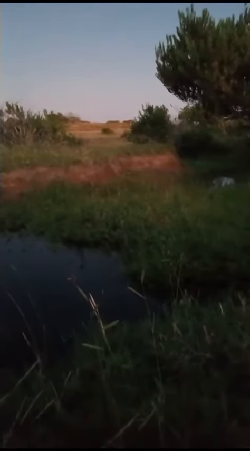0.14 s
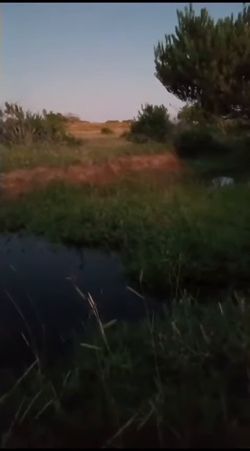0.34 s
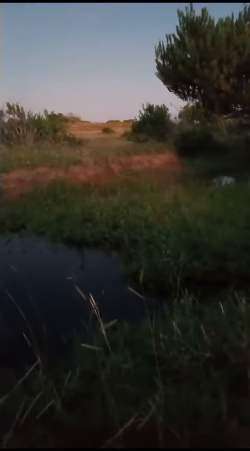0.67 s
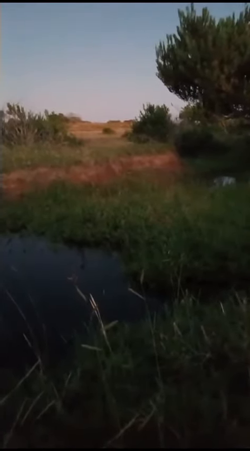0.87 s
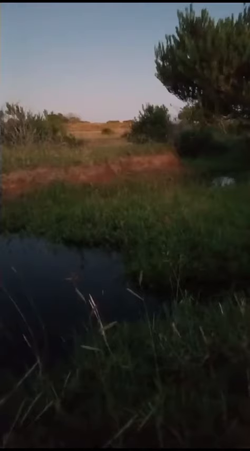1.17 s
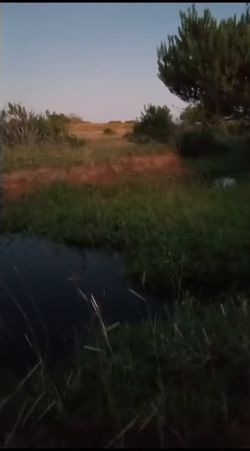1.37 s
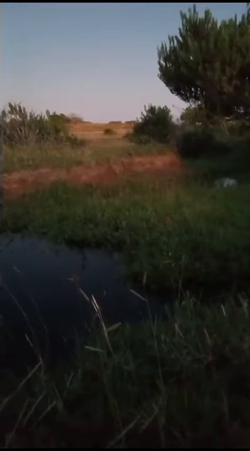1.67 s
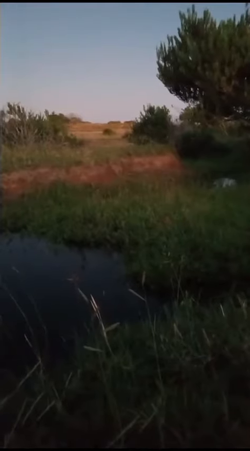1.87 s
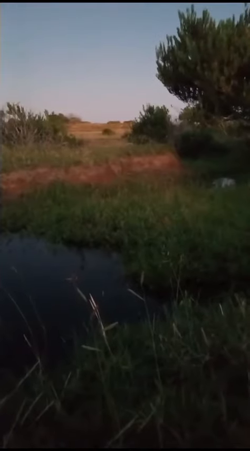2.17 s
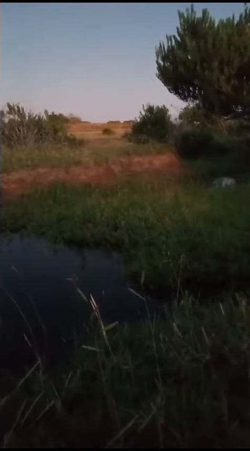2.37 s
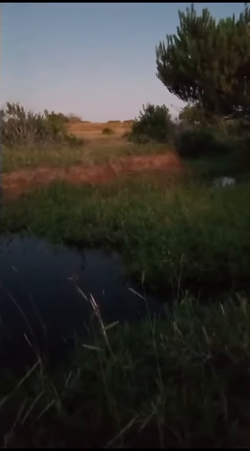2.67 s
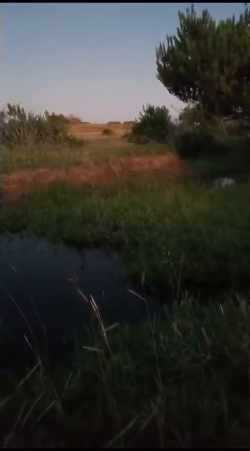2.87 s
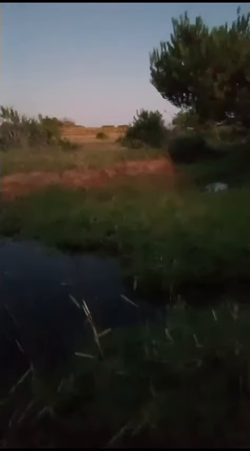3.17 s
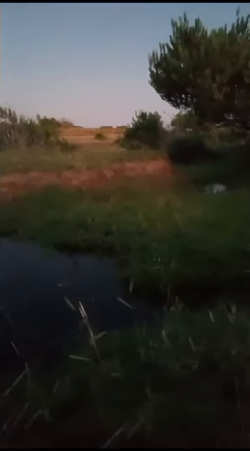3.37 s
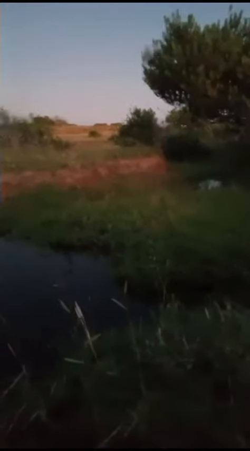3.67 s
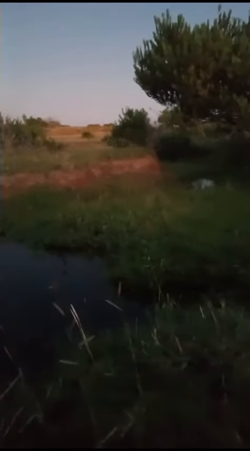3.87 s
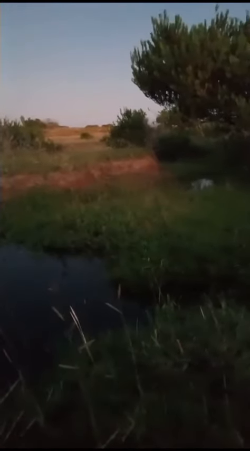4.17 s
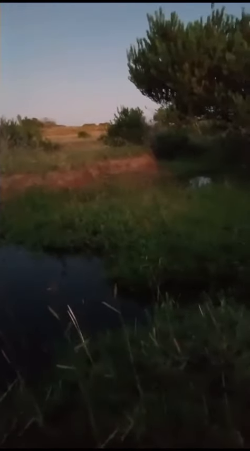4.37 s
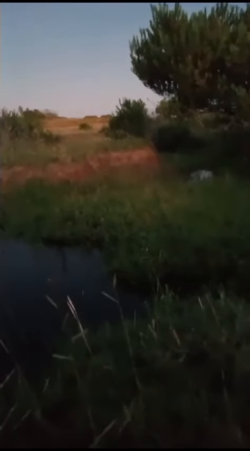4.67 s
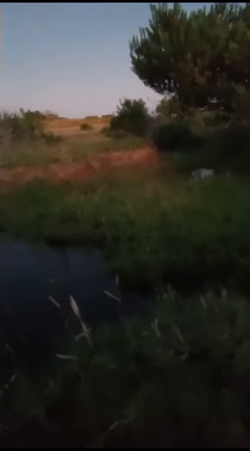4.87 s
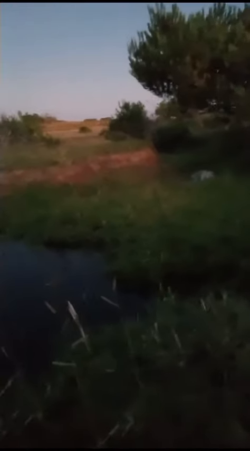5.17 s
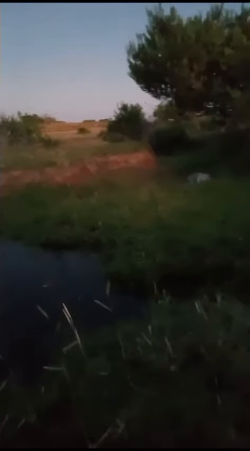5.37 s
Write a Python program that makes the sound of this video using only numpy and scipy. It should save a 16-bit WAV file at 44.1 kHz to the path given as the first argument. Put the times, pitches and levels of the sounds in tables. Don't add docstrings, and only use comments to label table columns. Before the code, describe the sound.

Frogs at a grassy pond at dusk: rapid paired high ticks and a far trill, arched chirping cries, then a close buzzing trill.

```python
import sys
import numpy as np
from scipy import signal
from scipy.fft import rfft, irfft
from scipy.io import wavfile
from scipy.ndimage import uniform_filter1d

SR = 44100
rng = np.random.default_rng(int(sys.argv[2]) if len(sys.argv) > 2 else 0)


def undo_db(level):
    steps = np.asarray(level, float) / 20
    return 10 ** steps


def to_wav(sig):
    pcm = np.clip(np.atleast_2d(sig), -1, 1) * 32767
    pcm = np.round(pcm).astype(np.int16)
    wavfile.write(sys.argv[1], SR, pcm.T)


N = 243873
TIME = np.arange(N) / SR

# start_s, rate_pulses_per_s, full_sac_hz, level_db
NEAR_TRILL_SLIPS = [(3.31, 219, 5050, -29), (3.345, 224, 5185, -27.5), (3.41, 216.5, 5020, -27),
                    (3.63, 217.3, 5033, -25), (3.865, 210, 5090, -24), (4.05, 214.8, 5110, -26),
                    (4.28, 215, 5144, -25.5), (4.42, 211, 5090, -26), (4.62, 210, 5150, -24),
                    (4.81, 208.7, 5060, -24.5), (5.0, 205, 5036, -25.5), (5.181, 206.5, 5120, -26),
                    (5.42, 204.5, 5060, -28)]
CREEP_PER_S2, SLIP_S = 3.5, .03
SAC_SLACK_HZ, SAC_FILL_S = 1050, 0.1
# start_s, rate_pulses_per_s, sac_hz, level_db
FAR_TRILL_COURSE = [
    (0, 188.4, 5100, -25.5),
    (.12, 188, 5100, -34),
    (.39, 187.8, 5100, -33),
    (.5, 187.6, 5100, -39),
    (.75, 186.8, 5100, -38.5),
    (.93, 185.5, 5100, -32.5),
    (1.075, 184.7, 5100, -33.5),
]
# start_s, rate_pulses_per_s, sac_hz, level_db
FAINT_TRILL_COURSES = [
    [(0, 196.7, 4430, -46), (.6, 193.3, 4910, -63), (1.9, 188, 4680, -63)],
    [(1.7, 213.2, 4180, -81), (1.9, 221.5, 4230, -45), (2.1, 223.7, 4220, -53.5), (2.8, 221, 4230, -52),
     (3.3, 211, 4170, -74)],
]
# first_tick_s, gap_s, peak_db
QUICK_PAIRS = [(.2054, 0.026, -18.5), (.312, 0.038, -19), (.4209, 0.038, -19), (.5307, 0.038, -20),
               (.638, 0.04, -19.5), (.7482, 0.041, -19), (.8594, 0.042, -18), (.9682, 0.04, -20),
               (1.0788, .0416, -19.5), (1.1912, 0.037, -18.5), (1.2965, 0.034, -19), (1.3997, .0345, -20),
               (1.502, 0.035, -20.5), (1.6053, 0.035, -20.5), (1.709, 0.035, -20), (1.8143, 0.035, -19),
               (1.919, .0325, -19.5), (2.0233, .0356, -19.5), (2.1296, 0.036, -19.5), (2.2358, 0.035, -19),
               (2.341, .0337, -18.5), (2.4446, 0.037, -20.5), (2.549, 0.034, -19), (2.6538, 0.036, -18),
               (2.7577, .0348, -18.5), (2.8634, 0.035, -18.5), (2.9686, 0.038, -18.5), (3.0777, .0381, -19),
               (3.1857, .0362, -21.5), (3.2948, 0.038, -22.5)]
# first_tick_s, gap_s, peak_db
SLOW_TICK_PAIRS = [(3.4082, .0378, -27), (3.5229, 0.049, -22), (3.65, .0405, -29), (3.7794, 0.034, -24),
                   (3.902, .0389, -22.5), (4.0301, .0383, -24.5), (4.1614, 0.048, -21),
                   (4.2914, .0426, -26), (4.4194, 0.039, -26), (4.545, 0.046, -25.5), (4.672, 0.052, -22),
                   (4.8294, 0.033, -26), (4.9474, 0.022, -26.5), (5.2116, .0339, -22.5),
                   (5.4191, 0.032, -24)]
QUICK_SECOND_DB, SLOW_SECOND_DB = 0.6, 5.5
# start_s, peak_db
STRAY_TICKS = [(.0403, -19.5), (.0805, -18.5), (.1516, -20.5), (3.258, -32), (5.0294, -17),
               (5.3221, -19.5)]
# start_s, peak_db
LOWER_TICKS = [(0.1537, -24), (4.5144, -31), (4.6502, -20), (4.6694, -23.5), (5.007, -25), (5.1472, -15.5),
               (5.2864, -19.5), (5.3044, -29), (5.4144, -18)]
# start_s, voice_clears_s, pitch_drops_s, top_of_third_partial_hz, third_db
CRY_EVENTS = [(1.1, 1.135, 1.218, 3830, -42), (1.525, 1.568, 1.648, 3800, -33),
              (1.925, 1.968, 2.055, 3850, -30), (2.345, 2.405, 2.475, 3850, -29),
              (2.765, 2.81, 2.892, 3860, -30), (3.175, 3.268, 3.315, 3700, -31),
              (3.6, 3.636, 3.745, 3730, -35), (3.99, 4.104, 4.124, 3740, -35),
              (4.37, 4.424, 4.507, 3700, -36), (4.748, 4.864, 4.888, 3700, -31),
              (5.155, 5.276, 5.29, 3620, -30)]
# hoarse_third_db, second_db, brightness_db
CRY_TIMBRES = [(-52.5, -56.5, 6.5), (-41.5, -43.5, 4.5), (-40.5, -40.5, 4), (-38.5, -38, 4.5),
               (-34.5, -34.5, -0.5), (-32.5, -35, -9.5), (-42, -40.5, -9.5), (-39.5, -44.5, -15),
               (-40.5, -41, -15.5), (-34.5, -36.5, -20), (-42.5, -40.5, -14)]
# multiple, level_db relative to the second
CRY_UPPER_PARTIALS = [(4, -20), (5, 2), (6, -15.5), (7, -26), (8, -42.5), (9, -30), (10, -41), (11, -43.5),
                      (12, -44)]
# after_start_s, third_hz, third_db, second_db
HOARSE_OPENING = [
    (0, 3100, -22, -18),
    (.02, 3220, -4, -10),
]
# before_clearing_s, third_hz, third_db, second_db
HOARSE_CLOSE = (.007, 3400, 0.1, -5)
# after_s, under_top_hz, third_db, second_db
CLEAR_VOICE = [
    (.004, 10, -3, 0.1),
    (0, 10, -5, -3),
]
# after_drop_s, under_top_hz, third_db, second_db
PITCH_DROP = [
    (0, 90, 0.1, -4),
    (.018, 310, -1, -14),
    (.034, 680, -10, -30),
    (.066, 1220, -40, -62),
]
TIRED_S, TIRED_FALL = 3.9, 0.55
# start_s, length_s
VOICE_BREAKS = [(2.852, .006), (4.07, .033), (4.458, .031), (4.838, .025), (5.247, .028)]
BREAK_DB = -20
# start_s, peak_db
WHOOP_EVENTS = [(0.1477, -40.5), (0.4551, -40.5), (0.7588, -40), (1.058, -40.5), (1.2609, -40.5),
                (1.5604, -41), (1.884, -40.5), (2.151, -42), (2.516, -40.5), (3.0777, -41.5), (3.3918, -43),
                (3.6017, -43.5), (3.8056, -43.5), (4.0136, -45), (4.362, -42.5), (4.7355, -44.5),
                (5.073, -43.5), (5.3641, -43)]
# after_start_s, pitch_hz, level_db
WHOOP_SWEEP = [
    (-.006, 970, -9.5),
    (0, 1200, 2),
    (.005, 1300, -10.5),
    (.010, 1770, 17),
    (0.013, 1950, 12),
    (.019, 2210, -4),
    (.023, 2200, -24.5),
]
# start_s, length_s, fall_already_past_s, first_partial_db, fifth_partial_db
WHINE_EVENTS = [(0, 0.055, 0.4, -64, -76.5), (0.293, 0.59, 0.0056, -56, -71),
                (1.045, 0.078, 0.063, -66, -66), (1.282, 0.37, 0.06, -61, -79),
                (1.872, 0.41, 0.15, -66.5, -83), (2.628, 0.089, 0.048, -61.5, -68),
                (2.773, 0.508, 0.022, -54, -64), (5.207, 0.2, 0.03, -59.5, -76.5),
                (5.447, .14, 0.0099, -50.5, -62)]
WHINE_TOP_HZ, WHINE_REST_HZ, WHINE_SINK_S = 679, 429.3, .165
WHINE_SAG_HZ_PER_S, WHINE_RELEASE_DB = 49, 16.5
CATCH_HZ, CATCH_WIDTH_HZ, CATCH_DB = 449, 19.2, 21
MOUTH_HZ, MOUTH_DB_PER_HZ = 456, 0.2151
# start_s, length_s, from_hz, to_hz, level_db
UPPER_WHINES = [(.85, .23, 398, 378, -60), (1.46, .09, 458, 433, -60), (1.83, .13, 505, 490, -61),
                (2.66, .12, 385, 380, -62), (3.33, .24, 462, 432, -57)]
# start_s, length_s, level_db, bubble_hz
SPLASH_EVENTS = [(1.196, 0.085, -51.5, 837), (1.226, 0.056, -54.5, 1084), (1.246, 0.086, -54.5, 640),
                 (1.476, 0.088, -62, 836), (1.517, 0.026, -67, 625), (2.117, 0.083, -60, 605),
                 (2.174, 0.036, -49.5, 610), (3.21, 0.02, -45.5, 523), (3.201, 0.5, -57.5, 1940),
                 (3.297, 0.081, -51, 1110), (4.984, 0.075, -60, 223), (3.181, 0.13, -64.5, 102)]
# time_s, level_db
BACKGROUND_LEVEL = [
    (0, 0.4),
    (3.3, -4),
    (3.6, -7.5),
    (4.9, -8),
    (5.53, -3),
]
# frequency_hz, density_db_per_hz
CHORUS_SPECTRUM = [(3600, -60), (3950, -45.5), (4200, -14), (4800, -10.5), (5160, -1.5), (5700, -11.5),
                   (6400, -19), (6650, -40.5), (7200, -60.5)]
# frequency_hz, density_db_per_hz
RUMBLE_SPECTRUM = [(20, -5.5), (40, -18), (65, 0.5), (120, -0.5), (250, -1.5), (330, -10.5), (450, -24)]
# frequency_hz, density_db_per_hz
HISS_SPECTRUM = [(250, 7.5), (500, 8.5), (1300, 2.5), (2000, 11), (3500, 3), (6500, 8.5), (8000, 4.5),
                 (9300, 1.5), (10000, -14), (14500, -24.5), (15300, -8.5), (16000, -22)]
CHORUS_DB, RUMBLE_DB, HISS_DB = -40, -63.5, -62
CHORUS_FOLLOWS, RUMBLE_FOLLOWS = 0.47, 0.68


def rms_one(x):
    return x / np.sqrt(np.mean(x ** 2) + 1e-20)


def span(rows):
    s, *columns = np.transpose(rows)
    part = slice(max(int(s[0] * SR), 0), min(int(s[-1] * SR), N))
    return part, [np.interp(TIME[part], s, column) for column in columns]


def fade(count, ramp_s):
    i = np.arange(count)
    return np.clip(np.minimum(i, count - i) / (ramp_s * SR), 0, 1)


def drift(rate_hz, count=N):
    rate_hz = min(rate_hz, 400)
    knots = rng.standard_normal(6 * 400 + 2)
    return 1.2 * np.interp(np.arange(count) / SR * rate_hz, np.arange(len(knots)), knots)


def phase_of(hz):
    return 2 * np.pi * np.cumsum(hz) / SR


def coloured(points):
    hz = np.fft.rfftfreq(N, 1 / SR) + 1
    at_hz, db = np.transpose(points)
    gain = undo_db(np.interp(np.log(hz), np.log(at_hz), db, -120, -120))
    return rms_one(irfft(rfft(rng.standard_normal(N)) * gain, N))


def near_rows():
    s, per_s, full_hz, db = np.transpose(NEAR_TRILL_SLIPS)
    ends = np.append(s[1:] - SLIP_S, N / SR)
    t = np.arange(s[0], N / SR + .005, .005)
    crept = per_s + CREEP_PER_S2 * (ends - s)
    rate = np.interp(t, np.ravel([s, ends], "F"), np.ravel([per_s, crept], "F"))
    sac_hz = np.interp(t, s, full_hz) - SAC_SLACK_HZ * np.exp(-(t - s[0]) / SAC_FILL_S)
    return np.transpose([t, rate, sac_hz, np.interp(t, s, db)])


def trill(rows, width_hz, waver_db, skirt_db, overtone_db, ground):
    part, (per_s, sac_hz, level_db) = span(rows)
    count = len(per_s)
    every = np.arange(count)
    coarse = np.arange(0, count, 100)
    pulse = np.exp(1j * phase_of(per_s * (1 + 0.00061 * drift(60, count))))
    partial = pulse ** 12
    voice = 0
    for k in range(13, 31):
        partial = partial * pulse
        hz = k * per_s[coarse]
        off = (hz - sac_hz[coarse]) / width_hz
        sac = np.exp(-off ** 2 / 2 + .45j * off ** 2 - .06j * off ** 3)
        sac += undo_db(skirt_db - 3.5 * np.abs(off)) * (off < 0) * np.exp(.9j * k * k)
        sac *= 1 + ground * np.exp(-2j * np.pi * hz * .002657)
        waver = undo_db(waver_db * drift(8.88, count))
        voice = voice + np.interp(every, coarse, sac) * waver * partial
    voice = voice / np.sqrt(uniform_filter1d(np.abs(voice) ** 2, size=2200) / 2)
    low = voice / pulse
    second_db, third_db = overtone_db
    tone = undo_db(level_db) * voice.real
    tone += undo_db(second_db) * (low * low).real
    tone += undo_db(third_db) * (voice * voice * voice).real
    out = np.zeros(N)
    out[part] = tone * fade(count, 0.0045)
    return out


def paired(rows, second_db):
    return [tick for s, gap, db in rows for tick in [(s, db), (s + gap, db + second_db)]]


def ticks(rows, first_hz, trim_db):
    out = np.zeros(N + SR)
    t = np.arange(int(.03 * SR)) / SR
    shape = (1 - np.exp(-t / 0.00076)) ** 2 * undo_db(-60 * t / 0.028) * 1.797
    second = np.diff(np.array(rows)[:, 0], prepend=-1) < .05
    chances = rng.random((len(rows), 2))
    for (s, db), late, (beat, start) in zip(rows, second, chances):
        hz = first_hz + 60 * late
        upper_mode = np.sin(2 * np.pi * (hz + 190) * t + 6 * start)
        tone = np.sin(2 * np.pi * hz * t) + (0.23 * beat + 0.33 * late) * upper_mode
        tone += undo_db(-55.0) * np.sin(4 * np.pi * hz * t)
        tone += undo_db(-58.5) * np.sin(6 * np.pi * hz * t)
        tone += undo_db(-17.0) * np.sin(2 * np.pi * 0.857 * hz * t) * np.exp(-t / 0.0027)
        i = max(int((s - .0012) * SR), 0)
        out[i:i + len(t)] += undo_db(db + trim_db) * shape * tone
    return out[:N]


def cry_rows(start, clear, drop, top_hz, db, hoarse_db, second_db):
    rows = [(start + s, hz, hoarse_db + a, second_db + b) for s, hz, a, b in HOARSE_OPENING]
    before_s, hz, a, b = HOARSE_CLOSE
    rows.append((clear - before_s, hz, hoarse_db + a, second_db + b))
    anchors = [clear, (clear + drop) / 2] + [drop] * len(PITCH_DROP)
    fall = TIRED_FALL if start > TIRED_S else 1
    for at, (s, under_hz, a, b) in zip(anchors, CLEAR_VOICE + PITCH_DROP):
        rows.append((at + s, top_hz - under_hz, db + a, second_db + b * fall))
    return rows


def cries():
    out = np.zeros(N)
    for row, (hoarse_db, low_db, bright_db) in zip(CRY_EVENTS, CRY_TIMBRES):
        start_s, clear_s = row[:2]
        part, (third_hz, third_db, second_db) = span(cry_rows(*row, hoarse_db, low_db))
        t, count = TIME[part], len(third_hz)
        hoarse = np.clip((clear_s - t) / 0.00067, 0, 1)
        pulses = np.sin(phase_of(150 + 30 * drift(60, count)))
        chop = 1 + hoarse * (.8 * pulses + .3 * drift(350, count)) + .12 * drift(150, count)
        chop += 1.3 * hoarse * uniform_filter1d(rng.standard_normal(count), size=24)
        jitter = (.003 + .019 * hoarse) * drift(300, count)
        phase = phase_of(third_hz / 3 * (1 + jitter))
        push = np.interp(t, [start_s, start_s + .04, clear_s + .04], [-.03, .055, .075])
        lift = phase_of(third_hz * hoarse * push)
        voice = undo_db(third_db) * np.sin(3 * phase)
        voice += undo_db(second_db) * (np.sin(2 * phase + lift) + undo_db(-35.0) * np.sin(phase))
        for k, db in CRY_UPPER_PARTIALS:
            partial_db = second_db + db + bright_db - 3.7 * hoarse + 2.1 * drift(150, count)
            voice += undo_db(partial_db) * np.sin(k * phase)
        out[part] += np.sqrt(2) * voice * chop * fade(count, .008)
    for s, length in VOICE_BREAKS:
        corners = [s - .006, s, s + length - .004, s + length]
        out *= undo_db(np.interp(TIME, corners, [0, BREAK_DB, BREAK_DB, 0]))
    return out


def whoops():
    out = np.zeros(N)
    variations = rng.normal(1, 0.028, (len(WHOOP_EVENTS), 2))
    for (s, db), (bend, stretch) in zip(WHOOP_EVENTS, variations):
        part, (hz, level_db) = span(np.array(WHOOP_SWEEP) * [stretch, bend, 1] + [s, 0, db])
        out[part] += undo_db(level_db + 1.0) * np.sin(phase_of(hz)) * fade(len(hz), 0.0045)
    return out


def upper_group(phase):
    group = 0
    for k, db in [(5, 0), (6, -3), (7, -11)]:
        group = group + undo_db(db + 6 * drift(18, len(phase))) * np.sin(k * phase)
    return group


def whines():
    out = np.zeros(N)
    for s, length, past, first_db, fifth_db in WHINE_EVENTS:
        part, (t,) = span([(s, 0), (s + length, length)])
        age = t + past
        hz = WHINE_REST_HZ - WHINE_SAG_HZ_PER_S * age
        hz += (WHINE_TOP_HZ - WHINE_REST_HZ) * np.exp(-(age / WHINE_SINK_S) ** 1.5)
        first_db = first_db - WHINE_RELEASE_DB * (t / length) ** 5
        first_db = first_db - CATCH_DB * np.exp(-((hz - CATCH_HZ) / CATCH_WIDTH_HZ) ** 2)
        phase, count = phase_of(hz), len(hz)
        first = undo_db(first_db + 3 * drift(40, count)) * np.sin(phase + .5 * drift(70, count))
        upper = undo_db(fifth_db - MOUTH_DB_PER_HZ * (hz - MOUTH_HZ)) * upper_group(phase)
        out[part] += np.sqrt(2) * (first + upper) * fade(count, 0.026)
    for s, length, from_hz, to_hz, db in UPPER_WHINES:
        part, (hz, level_db) = span([(s, from_hz, db), (s + length, to_hz, db - 3)])
        count = len(hz)
        phase = phase_of(hz * (1 + .004 * drift(90, count)))
        out[part] += undo_db(level_db) * upper_group(phase) * fade(count, 0.019)
    return out


def splashes():
    out = np.zeros(N + SR)
    t = np.arange(int(.15 * SR)) / SR
    for s, length, db, hz in SPLASH_EVENTS:
        births = rng.random(len(t)) < 900 / SR
        born = rng.standard_normal(len(t)) * births * np.exp(-(t / length) ** 2)
        bubble = np.sin(phase_of(hz * (1 + 1.9 * t))) * undo_db(-60 * t * hz / 14)
        bubble *= np.minimum(t * hz / 1.3, 1)
        swarm = signal.fftconvolve(born, bubble)[:len(t)]
        i = int(s * SR)
        out[i:i + len(t)] += undo_db(db) * rms_one(swarm) * np.sqrt(length / .15)
    return out[:N]


def scatter(x, level_db, t60, per_s):
    t = np.arange(int(.15 * SR)) / SR
    taps = rng.standard_normal(len(t)) * (rng.random(len(t)) < per_s / SR) * (t > .004)
    return undo_db(level_db) * signal.fftconvolve(x, taps * undo_db(-60 * t / t60))[:N]


def background():
    part, (background_db,) = span(BACKGROUND_LEVEL)
    count = len(background_db)
    chorus = coloured(CHORUS_SPECTRUM) * undo_db(2.5 * drift(150) + .8 * drift(25))
    rumble = coloured(RUMBLE_SPECTRUM) * undo_db(1.5 * drift(5.7) + 2.3 * drift(13))
    hiss = coloured(HISS_SPECTRUM)
    out = np.zeros(N)
    out[part] = undo_db(CHORUS_DB + CHORUS_FOLLOWS * background_db) * chorus[:count]
    out[part] += undo_db(RUMBLE_DB + RUMBLE_FOLLOWS * background_db) * rumble[:count]
    out[part] += undo_db(HISS_DB + background_db) * hiss[:count]
    return out


def scene():
    near = trill(near_rows(), width_hz=215, waver_db=1.8, skirt_db=-21, overtone_db=(-115, -112), ground=0)
    far = trill(FAR_TRILL_COURSE, width_hz=277, waver_db=3.5, skirt_db=-30,
                overtone_db=(-79, -82), ground=0.55)
    for rows in FAINT_TRILL_COURSES:
        far += trill(rows, width_hz=94, waver_db=7.0, skirt_db=-42.5, overtone_db=(-120, -120), ground=.01)
    tick = ticks(paired(QUICK_PAIRS, QUICK_SECOND_DB), first_hz=5060, trim_db=0)
    tick += ticks(STRAY_TICKS, first_hz=5060, trim_db=1)
    tick += ticks(paired(SLOW_TICK_PAIRS, SLOW_SECOND_DB), first_hz=5100, trim_db=0.5)
    tick += ticks(LOWER_TICKS, first_hz=4720, trim_db=-5.5)
    cry = cries()
    whoop = whoops()
    mix = near + far + tick + cry + whoop + whines() + splashes() + background()
    mix += scatter(near, -19.5, t60=0.24, per_s=900)
    mix += scatter(tick, -11.5, t60=0.07, per_s=730)
    mix += scatter(cry, -20.5, t60=0.18, per_s=800)
    mix += scatter(whoop, -8.5, t60=0.07, per_s=1100)
    return mix[None, :]


def roll_off(x):
    return signal.sosfilt(signal.butter(12, 15760, fs=SR, output="sos"), x)


def record(dry):
    return roll_off(dry)


dry = scene()
out = record(dry)
to_wav(out)
```